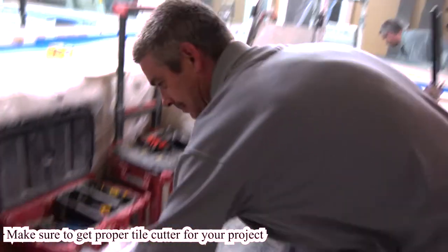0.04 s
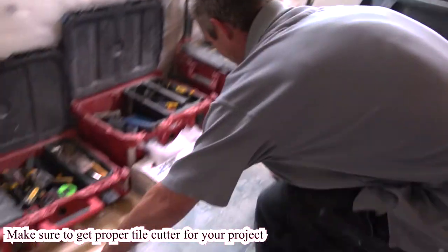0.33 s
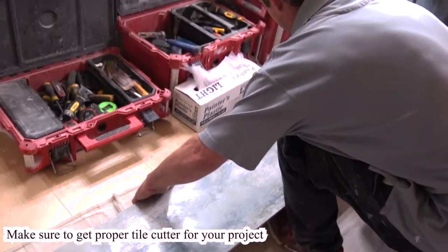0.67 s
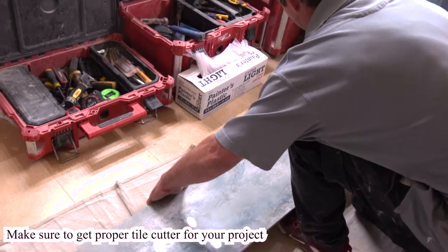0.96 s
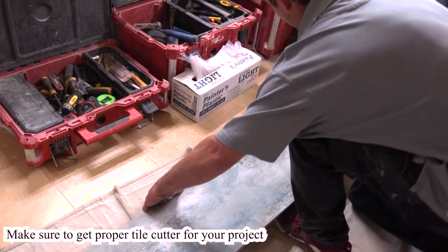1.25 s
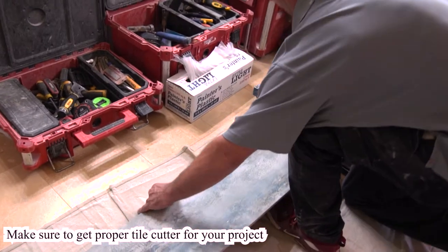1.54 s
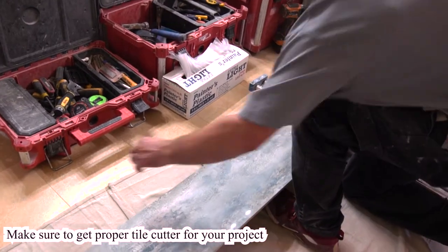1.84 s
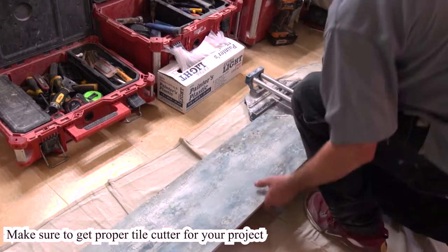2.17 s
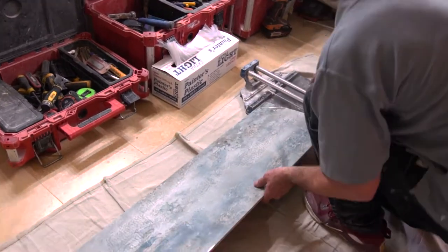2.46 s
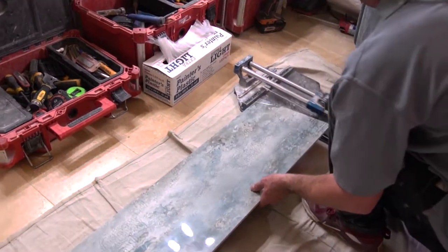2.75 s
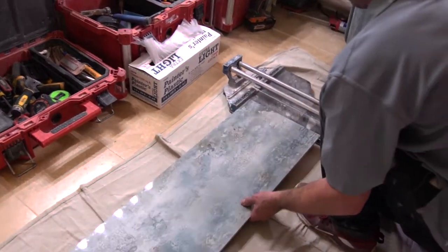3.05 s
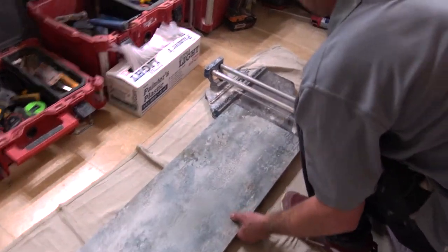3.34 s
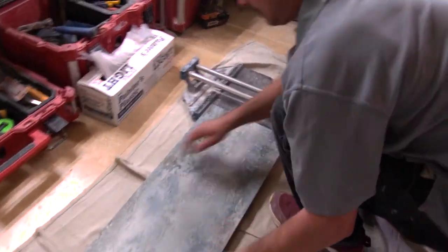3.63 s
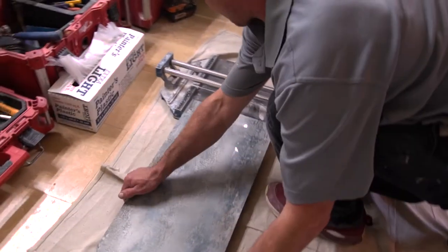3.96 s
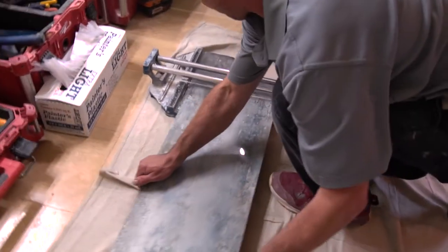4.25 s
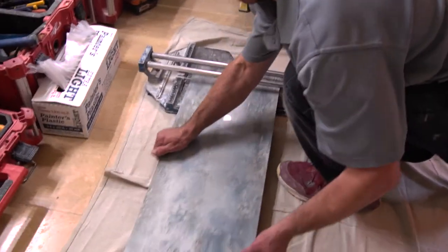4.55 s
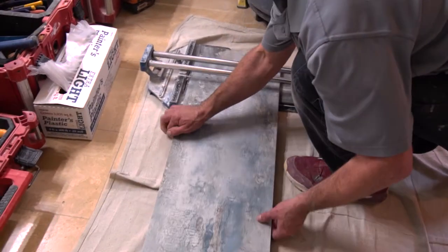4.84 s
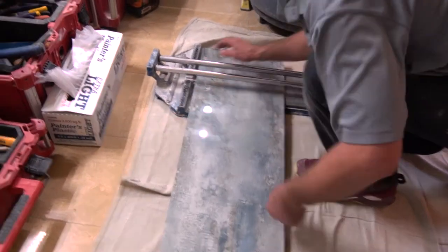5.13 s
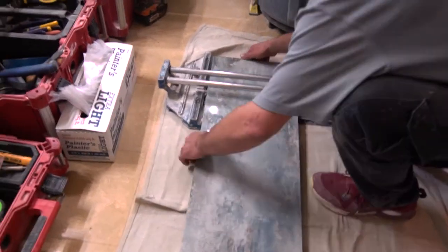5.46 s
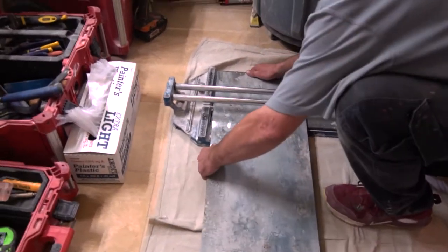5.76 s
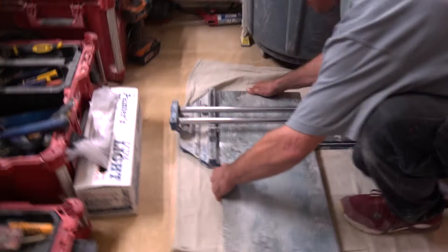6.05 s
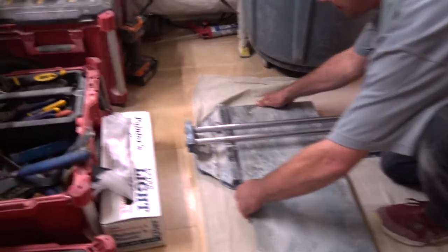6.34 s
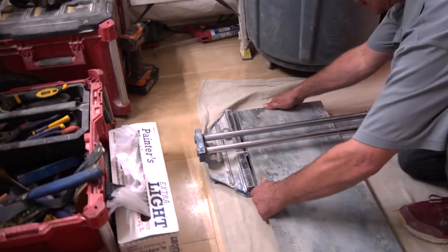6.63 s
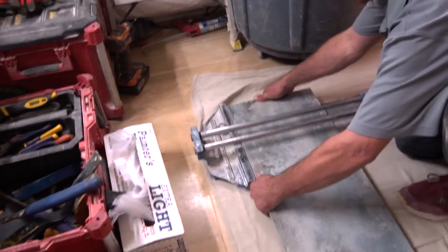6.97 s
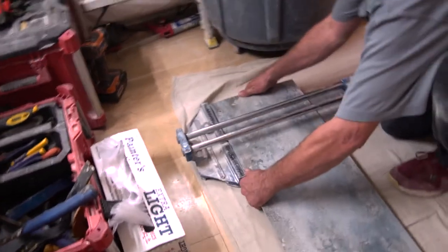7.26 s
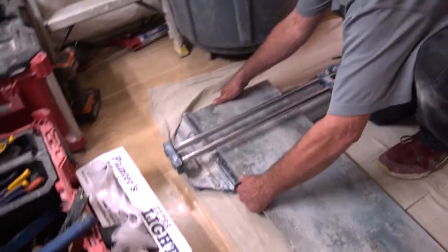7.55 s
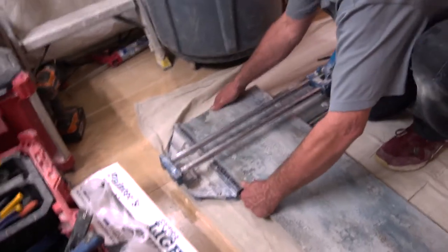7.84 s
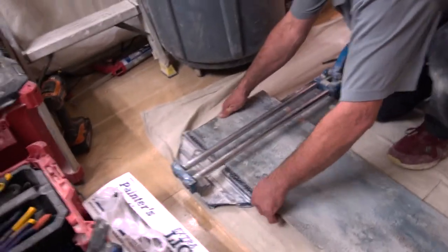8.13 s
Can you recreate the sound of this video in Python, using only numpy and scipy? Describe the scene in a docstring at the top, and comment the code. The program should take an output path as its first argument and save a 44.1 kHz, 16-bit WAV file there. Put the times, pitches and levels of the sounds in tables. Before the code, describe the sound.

In a bare, echoing room, a big ceramic tile is moved with soft thuds and dull knocks on wooden boards. A rising scrape ends in a very loud clack against a steel cutter, followed by gritty, stuttering sliding and short groans. Last comes the faint hiss of a cutting wheel, with light ticks and one heavy knock. A nearby hand-held microphone rumbles and is softly bumped.

```python
"""Dull knocks and soft thuds on a wooden floor come first, as a large ceramic tile is shifted on a cloth.
The tile scrapes onto a hand cutter, rings with loud clacks against the steel and judders into place.
Rubbing makes it groan briefly, and the cutter's scoring wheel hisses as it crushes a line in the glaze.
The bare room echoes, and a hand-held microphone close by adds a low rumble and a few soft bumps."""
import sys
import numpy as np
from scipy import signal
from scipy.fft import rfft, irfft, next_fast_len
from scipy.io import wavfile

SR = 44100
rng = np.random.default_rng(int(sys.argv[2]) if len(sys.argv) > 2 else 0)


def dump_mix(stems):
    """Bounce the given channels to the path in sys.argv[1] as a 16-bit WAV at rate SR."""
    frames = np.atleast_2d(stems).T  # one column per channel
    limited = np.clip(frames, -1, 1)  # hard clip at full scale
    pcm = np.round(limited * 32767).astype(np.int16)
    wavfile.write(sys.argv[1], SR, pcm)


N = 361355
TIME = np.arange(N) / SR
ONE_SECOND = TIME[:SR]

# Tone colours, from low to high pitch: f/Hz, relative level/dB
AIR_COLOUR = [(35, -19), (60, -12), (81, -13.5), (179, -16.5), (475, -10.5), (738, -13.5), (1200, -11),
              (2100, -19), (3580, -20.5), (15500, -42)]
RUMBLE_COLOUR = [(4, -8), (11, 3), (20, 7.5), (30, -12.5), (50, -24.5), (90, -33), (200, -47.5),
                 (1000, -100)]
FINGER_COLOUR = [(25, -0.5), (60, -0.5), (120, -6.5), (250, -19), (500, -36.5), (2000, -46), (9000, -80)]
SHUDDER_COLOUR = [(60, -29), (120, 1.5), (190, -10.5), (310, 9), (550, 4.5), (1400, -6.5), (3000, -42),
                  (12000, -63.5)]
WHEEL_COLOUR = [(800, -19), (2000, 2.5), (4000, 0), (6000, -1.5), (7200, -6.5), (10000, -6), (15500, -13)]
CARRIAGE_COLOUR = [(100, -18), (300, -4.5), (500, 4.5), (850, -2.5), (1300, 2), (2200, -14.5),
                   (6000, -16.5), (15000, -45)]
SLIDE_COLOUR = [(80, -39), (156, -11.5), (215, -34), (370, -12.5), (485, 0), (700, -6.5), (1250, -9),
                (2000, -13), (2900, -14), (4400, -20.5), (5600, -16), (7300, -31), (15500, -37.5)]
DRAG_COLOUR = [(60, -39), (190, -28), (270, -8.5), (480, -4.5), (950, -3.5), (1550, -9.5), (2000, -20),
               (3300, -19), (4500, -24.5), (6000, -27), (7500, -36.5), (15500, -47)]
BASE_COLOUR = [(60, -48.5), (130, -36.5), (230, -16.5), (400, -8.5), (550, -3.5), (1050, -0.5), (1600, -11),
               (2500, -20), (5500, -36.5), (8000, -47.5), (15000, -58.5)]
STEEL_COLOUR = [(150, -32.5), (500, -9.5), (1000, -5), (1800, 7.5), (3000, -1.5), (5700, 4), (7500, -3.5),
                (11500, -5.5), (15000, -17.5)]
TILE_COLOUR = [(60, -36), (170, -20.5), (290, -12), (600, -3.5), (1100, 1), (1650, 1.5), (2000, -7),
               (3000, -1.5), (3700, -1.5), (4500, -14.5), (5500, -11.5), (7500, -28), (15000, -50.5)]

# Tones that ring after a hit: f/Hz, relative level/dB, decay/s (the time to fade by 60 dB)
BASE_TONES = [(388.4, -15, 0.43), (475, 1.5, 0.19), (563.4, 1.5, 0.27), (682, -7, .32), (736, -7, 0.47),
              (790, -17.5, .18), (957, -2.5, 0.31), (1110, -0.5, 0.12), (1335, -3.5, 0.14)]
STEEL_TONES = [(1760, -31, .15), (2667, -1, .091), (4640, -3, .07), (5520, 3.5, 0.071), (6320, 2, 0.097),
               (7900, -6, 0.11)]
TILE_TONES = [(295, -6.5, 0.34), (454, -12, 0.88), (495.5, 6, 0.33), (593.6, -0.5, 0.38), (702, -4.5, .59),
              (786, -2, .39), (920, 1, 0.3), (1050, 7.5, 0.23), (1022, -8, 0.13), (1110, 6.5, 0.2),
              (1183, -2.5, 0.57), (1347, -5, 0.96), (1410, 3, 0.091), (1491, 4.5, 0.3), (1697, -9.5, .31),
              (2192, -1.5, 0.22), (2420, -15, .52), (2670, -18, .73), (2740, 7, .093), (2810, -0.5, .3),
              (2980, -7, .38), (3120, -17, .11), (3590, -6, 0.11), (3620, 2, 0.2), (3930, -13, .25),
              (3835, -9.5, .168), (5030, -15.5, 0.13), (5380, -1, 0.11), (5490, -12.5, .17),
              (6290, -25.5, .25)]
# Thin tones of the cutter's steel bed: f/Hz, relative level/dB
BED_TONES = [(4511, -51.5), (5238, -55), (5512, -50), (5771, -75), (6589, -69), (7181, -69), (9313, -60),
             (10664, -68)]
# How long the room echoes: f/Hz, decay/s
ROOM_DECAY = [(150, 0.78), (500, 0.68), (1500, 0.71), (3500, 0.56), (7000, .54), (14000, 0.61)]

# Fingers on the microphone: t/s, thump level/dB, f/Hz, decay/s, rub level/dB
BUMPS = [(3.879, -14.5, 25.8, 0.45, -31.5), (7.845, -18, 21, 1, -37.5), (8.06, -31, 24, 0.44, -47)]
# Floorboard thuds: t/s, level/dB, f/Hz
THUDS = [(.05, -43.5, 224), (0.223, -48, 137.6), (.224, -43.5, 276), (1.248, -41, 281), (1.48, -44.5, 154),
         (2.125, -37.5, 146.6), (3.256, -34.5, 254), (3.319, -45, 133), (3.436, -36.5, 267)]
# Groans and squeaks of the tile: t/s, level/dB, f/Hz, half length/s
GROANS = [(1.327, -51, 3640, .008), (2.162, -27.5, 615, 0.022), (2.216, -32, 600, 0.0083),
          (3.787, -43, 485, 0.0092), (3.827, -44.5, 477, .012), (4.172, -45, 509.4, 0.04),
          (4.822, -42, 481, 0.07), (5.007, -38, 487, 0.016), (6.24, -45.5, 1966, 0.0069),
          (8.083, -25, 499, 0.022), (8.184, -43, 497, .012)]
# Shoves of the carriage that holds the wheel: peak t/s, level/dB
SHOVES = [(6.77, -50.5), (7.0, -39.5), (7.29, -49.5), (7.64, -47), (7.82, -50.5), (8.08, -48)]
# Pushes that slide the tile: peak t/s, relative level/dB, rise/s, fall/s
PUSHES = [(.35, -49.5, 0.094, 0.1), (.95, -45.5, 0.032, 0.052), (1.35, -43, 0.042, 0.2),
          (1.73, -44.5, .05, 0.097), (4.149, -36.5, 0.07, 0.074), (4.83, -32.5, 0.22, 0.18),
          (5.22, -52.5, 0.054, 0.066), (5.6, -49, 0.089, 0.13), (6.05, -48.5, 0.097, 0.13),
          (6.24, -45, 0.033, 0.027)]
# The long drag over the cutter: t/s, relative pressure/dB, relative grit/dB
DRAG = [(2.58, -48.5, -51.5), (2.622, -39, -40), (2.774, -46.5, -46.5), (2.828, -25, -39),
        (2.868, -24.5, -39.5), (2.918, -18, -25.5), (2.95, -20.5, -33), (3.02, -19, -30)]
# The sliding tile catches about ten times a second: t/s, level/dB
CATCHES = [(4.4154, -39.5), (4.5216, -41), (4.608, -33), (4.704, -33.5), (4.812, -32), (4.893, -36),
           (4.9796, -27.5)]
# Ticks of carriage and chipping glaze: t/s, level/dB, bass/dB, treble/dB, chatter decay/s
TICKS = [(.836, -56, 9, -8, 0.18), (3.443, -54.5, 0, 9, .09), (5.6306, -42.5, -6, 19, 0.11),
         (6.4642, -35.5, 5, 1.5, 0.081), (7.6286, -45, 17, -6, .07), (8.061, -46, 0, -5, .04)]
# Knocks on the floor: t/s, level/dB, bass/dB, treble/dB, chatter decay/s, number of contacts
KNOCKS = [(.218, -41, 3, 0, 0.54, 1), (.689, -49.5, -11, 17, 0.061, 1), (.834, -42, -3, 9, 0.4, 1),
          (1.246, -31, 10, 8, 0.24, 1), (1.428, -30, 19.5, 15, 0.083, 1), (1.529, -41.5, 19, 4, 0.033, 1),
          (1.652, -30.5, 10.5, 19.5, .17, 1), (2.09, -39.5, -10, 7.5, 0.081, 1),
          (2.11, -23, -9, 0.5, 0.24, 4), (2.806, -30, -5, -6, .43, 1), (3.345, -31, 3, 13.5, .1, 1),
          (3.671, -47.5, -8, -8, .025, 1), (7.027, -13, 2, -2, 0.095, 2)]
# Clacks of tile on steel: same columns as KNOCKS
CLACKS = [(2.2562, -15.5, 6, 12, 0.058, 1), (2.3116, -23, -2, -0.5, 0.028, 1),
          (2.9108, -18, 5, -3, 0.065, 1), (3.033, -8, -4, 2.5, 0.082, 4)]


def gain(db):
    """Turn decibels into a number to multiply by."""
    return 10 ** (np.asarray(db) / 20)


def unit(x):
    """Scale a sound to an average (rms) size of one."""
    return x / np.sqrt(np.mean(x ** 2))


def look_up(hz, points):
    """Read between the rows of a table, giving each octave equal room."""
    f, value = np.transpose(points)
    return np.interp(np.log(np.maximum(hz, 1)), np.log(f), value)


def colour(x, points):
    """Filter a sound to give it a tone colour."""
    size = 2 * next_fast_len(len(x) // 2 + 4096)
    response = gain(look_up(np.fft.rfftfreq(size, 1 / SR), points))
    cepstrum = irfft(np.log(response))
    # folding this in half keeps the filter from sounding before its input
    cepstrum[1:size // 2] *= 2
    cepstrum[size // 2 + 1:] = 0
    return irfft(rfft(x, size) * np.exp(rfft(cepstrum)))[:len(x)]


def keep_side(x, side, hz, order):
    """Keep the "low" or the "high" part of a sound."""
    return signal.sosfilt(signal.butter(order, hz, side, fs=SR, output="sos"), x)


def fade(decay_s):
    """A one-second curve that falls by 60 dB every decay_s."""
    return np.exp(-np.log(1000) * ONE_SECOND / max(decay_s, 1e-3))


def add(out, t, x):
    """Mix x in from time t."""
    start = int(t * SR)
    out[start:start + len(x)] += x[:N - start]


def swell(t, db, rise_s, fall_s):
    """The strength of one movement: it builds to a peak at t and eases off."""
    away = np.maximum((t - TIME) / rise_s, (TIME - t) / fall_s)
    return gain(db) * np.exp(-np.minimum(np.abs(away), 20) ** 1.32)  # power 1 is pointed, 2 is round


def flutter(per_s, depth_db):
    """A strength that wanders at random."""
    points = rng.standard_normal(2048)
    return gain(depth_db * np.interp(TIME * per_s, np.arange(len(points)), points))


def grains(per_s, spread_db):
    """Many tiny clicks of uneven size."""
    size = gain(spread_db * np.minimum(rng.exponential(size=N), 5))
    happens = rng.random(N) < per_s / SR
    return unit(happens * size * rng.standard_normal(N))


def ring(tones):
    """A struck object rings with several tones, each fading at its own rate."""
    sound = sum(gain(db) * fade(decay_s) * np.sin(2 * np.pi * (hz * ONE_SECOND + turn))
                for (hz, db, decay_s), turn in zip(tones, rng.random(len(tones))))
    return unit(sound * (1 - fade(0.014)))  # the contact takes a moment to push


def air():
    """A faint, gently wavering background hush."""
    return gain(-55) * unit(colour(rng.standard_normal(N), AIR_COLOUR)) * flutter(4.3, 0.61)


def handling():
    """The hand-held microphone rumbles, is bumped and rubbed by fingers, and clicks once."""
    out = gain(-37.5) * unit(colour(rng.standard_normal(N), RUMBLE_COLOUR))
    rise_s, hold_s, fall_s = 0.0051, 0.046, 0.023
    touch = np.minimum(ONE_SECOND / rise_s, 1) * np.exp(-np.maximum(ONE_SECOND - hold_s, 0) / fall_s)
    for t, db, hz, decay_s, rub_db in BUMPS:
        rub = gain(rub_db) * touch * unit(colour(rng.standard_normal(SR), FINGER_COLOUR))
        thump = gain(db) * fade(decay_s) * np.sin(2 * np.pi * hz * ONE_SECOND)
        add(out, t, rub - thump)
    click = gain(-22.5) * fade(0.0058) * np.sin(2 * np.pi * 1650 * ONE_SECOND)
    add(out, 5.538, click)
    return out


def room_echo(x):
    """Bare walls and a wooden floor throw sound back; each pitch range fades at its own rate."""
    noise, hz = rfft(rng.standard_normal(SR)), np.fft.rfftfreq(SR, 1 / SR)
    centres, decays = np.transpose(ROOM_DECAY)
    tail = np.zeros(SR)
    for share, decay_s in zip(np.eye(len(centres)), decays):
        band = look_up(hz, list(zip(centres, share)))
        tail += irfft(noise * band, SR) * fade(decay_s)
    tail *= np.clip((ONE_SECOND - 0.005) / 0.0057, 0, 1)  # the echo starts a moment late
    return signal.fftconvolve(x, tail / np.sqrt(np.sum(tail ** 2)))[:N]


def floor_thuds():
    """Shifting weight rings one low tone of the floor and briefly rattles the boards."""
    out, decay_s = np.zeros(N), 0.26
    for t, db, hz in THUDS:
        tone = np.sin(2 * np.pi * hz * ONE_SECOND) * fade(decay_s) * (1 - fade(0.022))
        dull = [(hz / 2, -14), (hz, 0), (2 * hz, -16), (10 * hz, -60)]
        boards = unit(colour(rng.standard_normal(SR), dull)) * fade(decay_s / 2)
        add(out, t, gain(db) * (tone + gain(-2.5) * boards))
    return out


def wheel_scoring():
    """The wheel crushes a line in the glaze as its carriage rubs the rails; each shove swells both."""
    bite_s, build_s = 6.46, 0.3
    hiss = unit(colour(grains(13000, 1.8), WHEEL_COLOUR)) * flutter(29, 0.63)
    rails = unit(colour(grains(1500, 0.72), CARRIAGE_COLOUR)) * flutter(27, 2.1)
    rolling = np.clip((TIME - bite_s) / build_s + 1, 0, 1)
    bite = swell(bite_s, -63, rise_s=0.051, fall_s=0.094)
    shoves = sum(swell(t, db, rise_s=0.034, fall_s=0.036) for t, db in SHOVES)
    hiss *= bite + gain(-57.5) * rolling + gain(-11.5) * shoves
    rails *= gain(-59.5) * rolling + shoves
    return hiss + rails


def tile_groans():
    """Quick sticking and slipping makes the tile flex with one unsteady tone and weak overtones."""
    out = np.zeros(N)
    wobbly_time = np.cumsum(flutter(90, 0.28)) / SR
    for t, db, hz, half_s in GROANS:
        near = np.abs(TIME - t) < 4 * half_s
        phase = 2 * np.pi * hz * wobbly_time[near]
        tone = np.sin(phase) + gain(-19) * np.sin(2 * phase) + gain(-25.5) * np.sin(3 * phase)
        hump = np.exp(-0.5 * ((TIME[near] - t) / half_s) ** 2)
        out[near] += np.sqrt(2) * gain(db) * tone * hump
    return out


def ceramic(clicks, patches_per_s):
    """Clicks ring the tile's many high tones; the mix changes as the contact finds a new patch."""
    rung, hop = np.zeros(N), int(SR / patches_per_s)
    for start in range(0, N, hop):
        part = clicks[start:start + 2 * hop]
        part = part * np.sqrt(np.hanning(2 * hop))[:len(part)]
        patch = rng.standard_normal(4096) * fade(0.045)[:4096]
        add(rung, start / SR, signal.fftconvolve(part, patch / np.sqrt(np.sum(patch ** 2))))
    return unit(keep_side(clicks, "low", 1200, order=3) + keep_side(rung, "high", 1200, order=3))


def tile_shudder():
    """The long tile flexes and rattles softly as it settles."""
    rattle = unit(colour(ceramic(grains(300, 3.5), patches_per_s=4), SHUDDER_COLOUR))
    return rattle * swell(3.267, -35.5, rise_s=0.13, fall_s=0.19)


def scrape(clicks, pressure, grit, tone_colour, patches_per_s, ring_db, body_db, grit_db):
    """The tile's rough back catches and slips; pressure drives the low part and grit the high part."""
    slips = ceramic(clicks, patches_per_s)
    ringing = signal.fftconvolve(slips, ring(TILE_TONES))[:N]
    sound = unit(colour(slips, tone_colour)) + gain(ring_db) * unit(ringing)
    body = unit(keep_side(sound, "low", 2000, order=4))
    treble = unit(keep_side(sound, "high", 2100, order=4))
    return gain(body_db) * body * pressure + gain(grit_db) * treble * grit


def tile_sliding():
    """Pushes slide the tile, with a gritty slip after each catch; a hard push makes the steel sing."""
    force = sum(swell(*push) for push in PUSHES)
    slip_rise_s, bed_decay_s = 0.0064, 0.22
    slips = sum(swell(t + slip_rise_s, db + 1.5, slip_rise_s, fall_s=0.015) for t, db in CATCHES)
    bed_tones = [(hz, db, bed_decay_s) for hz, db in BED_TONES]
    bed = unit(signal.fftconvolve(grains(1000, 1), ring(bed_tones))[:N])
    judder = grains(2200, 1.5) * flutter(70, 1.6)
    rub = scrape(judder, force, force + slips, SLIDE_COLOUR, patches_per_s=4,
                 ring_db=-14, body_db=-4, grit_db=-11.5)  # the hand keeps the ringing faint
    return rub + gain(-11.5) * bed * force * (force / force.max()) ** 3


def tile_dragging():
    """The tile is hauled over the cutter's bed, harder and harder, until it drops."""
    times, pressure_db, grit_db = np.transpose(DRAG)
    release_s = 0.056
    touching = np.exp(-np.abs(TIME - np.clip(TIME, times[0], times[-1])) / release_s)
    pressure, grit = (touching * gain(np.interp(TIME, times, db)) for db in (pressure_db, grit_db))
    return scrape(grains(1800, 1), pressure, grit, DRAG_COLOUR, patches_per_s=24,
                  ring_db=-20.5, body_db=-3, grit_db=-1.5)


def rocking(landings, gap_s, loss_db, bass_step_db, treble_step_db):
    """A heavy landing rocks through evenly spaced hits; level and colour change in equal steps."""
    return [(t + k * gap_s, db - k * loss_db,
             bass_db + k * bass_step_db, treble_db + k * treble_step_db, chatter_s)
            for t, db, bass_db, treble_db, chatter_s, contacts in landings
            for k in range(round(contacts))]


def hits(table, tones, tone_colour, ring_db, top_share=0.5):
    """Each hit is a short, noisy chatter along with the object's clear ringing tones."""
    out = np.zeros(N)
    for t, db, bass_db, treble_db, chatter_s in table:
        chatter = unit(colour(rng.standard_normal(SR) * fade(chatter_s), tone_colour))
        # a flat, heavy contact brings out the bass; a hard edge brings out the treble
        contact = [(500, bass_db), (900, 0), (1400, 0),
                   (3600, treble_db), (6000, treble_db), (9000, top_share * treble_db)]
        hit = colour(chatter + gain(ring_db) * ring(tones), contact)
        energy = np.sum(hit ** 2) / (0.013 * SR)
        add(out, t, gain(db) * hit / np.sqrt(energy))
    return out


def light_ticks():
    """The carriage and the chipping glaze tick with a steely ring."""
    return hits(TICKS, STEEL_TONES, STEEL_COLOUR, ring_db=-6, top_share=0.96)


def base_knocks():
    """The tile and the cutter's base knock dully on the wooden floor."""
    contacts = rocking(KNOCKS, gap_s=0.017, loss_db=0.1, bass_step_db=3.5, treble_step_db=-0.5)
    return hits(contacts, BASE_TONES, BASE_COLOUR, ring_db=-4.5)


def tile_catches():
    """Each catch of the sliding tile strikes both the tile and the steel under it."""
    bass_db, treble_db, chatter_s, steel_db = 7, -4, 0.095, -15.5
    tile = [(t, db, bass_db, treble_db, chatter_s) for t, db in CATCHES]
    steel = [(t, db + steel_db, 0, 0, chatter_s) for t, db in CATCHES]
    return (hits(tile, TILE_TONES, TILE_COLOUR, ring_db=-3)
            + hits(steel, STEEL_TONES, STEEL_COLOUR, ring_db=-2))


def tile_clacks():
    """The tile strikes the cutter; the harder its edge bites, the more the steel rings too."""
    tile = rocking(CLACKS, gap_s=0.0138, loss_db=0.73, bass_step_db=1.65, treble_step_db=-1)
    steel = [(t, db - 25.5 + treble_db, bass_db, treble_db, chatter_s)
             for t, db, bass_db, treble_db, chatter_s in tile]
    return (hits(tile, TILE_TONES, TILE_COLOUR, ring_db=-4.5, top_share=0.45)
            + hits(steel, STEEL_TONES, STEEL_COLOUR, ring_db=-2.5, top_share=0.091))


def scene():
    """Hits, rubbing and groans echo in one room, over the hush and the handling noise."""
    knocks = base_knocks() + floor_thuds()
    clacks = tile_clacks() + tile_catches()
    ticks = light_ticks()
    rubbing = tile_dragging() + tile_sliding() + tile_shudder() + wheel_scoring()
    groans = tile_groans()
    echo = room_echo(gain(-6) * knocks + gain(-4.5) * clacks + gain(-5.5) * ticks
                     + gain(-4) * rubbing + gain(-8) * groans)
    return (knocks + clacks + ticks + rubbing + groans + echo + air() + handling())[None]


def record(dry):
    """The loudest clack overloads and is clipped; the very highest treble is cut away."""
    top_hz = 15800
    treble_cut = signal.ellip(12, 0.2, 90, top_hz, fs=SR, output="sos")
    return signal.sosfilt(treble_cut, np.clip(dry, -0.93, 0.93))


dry = scene()
out = record(dry)
dump_mix(out)
```